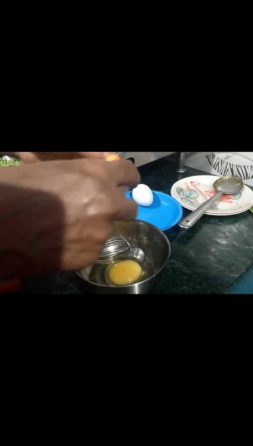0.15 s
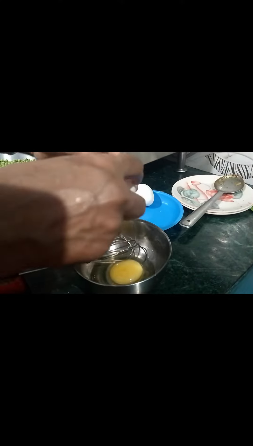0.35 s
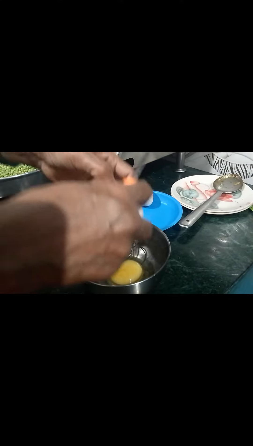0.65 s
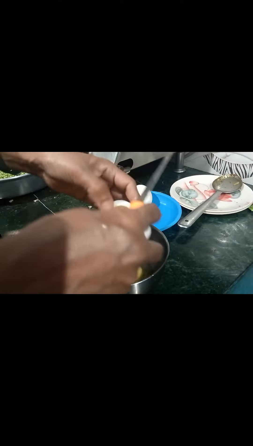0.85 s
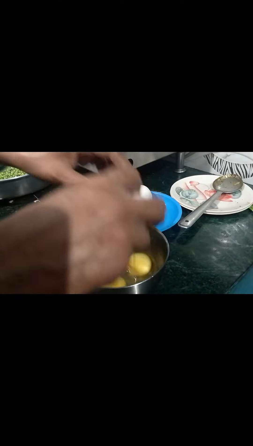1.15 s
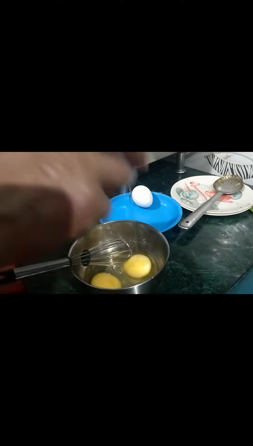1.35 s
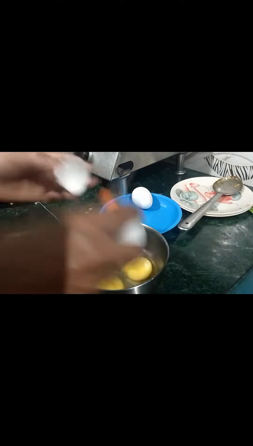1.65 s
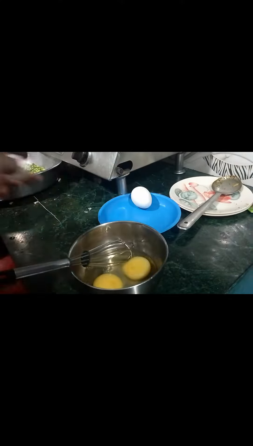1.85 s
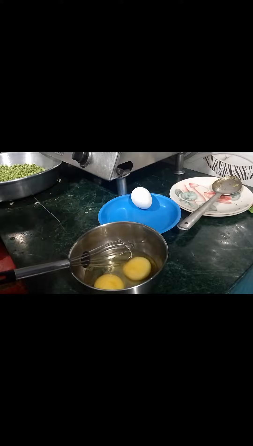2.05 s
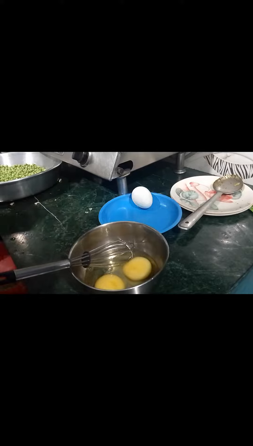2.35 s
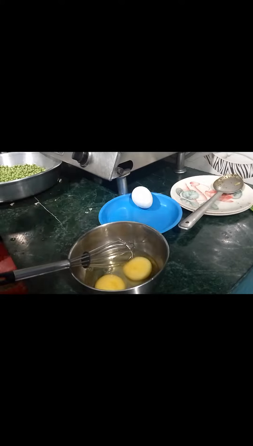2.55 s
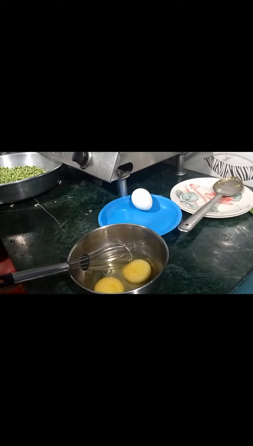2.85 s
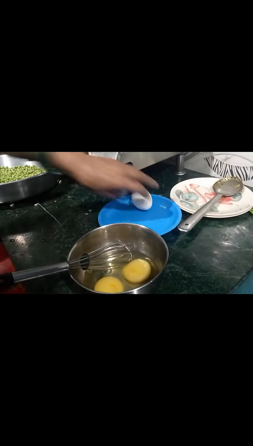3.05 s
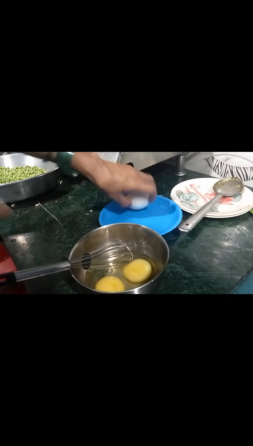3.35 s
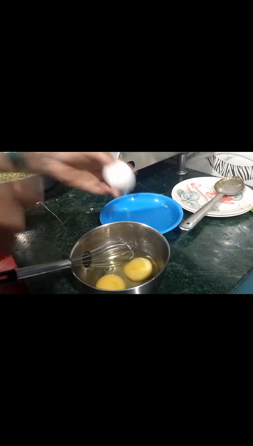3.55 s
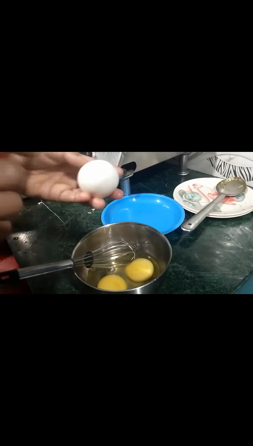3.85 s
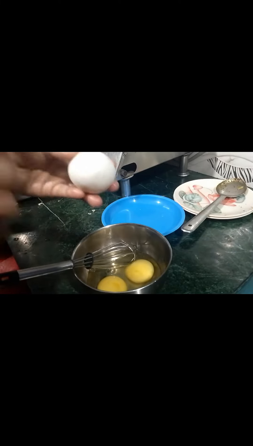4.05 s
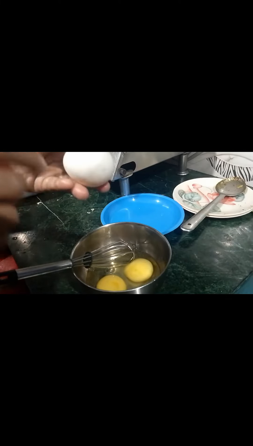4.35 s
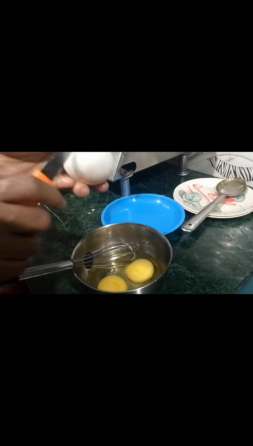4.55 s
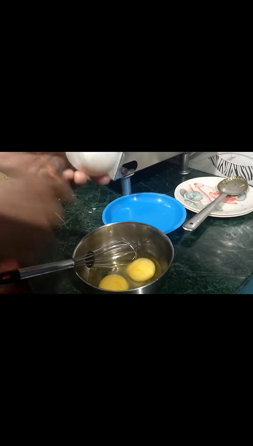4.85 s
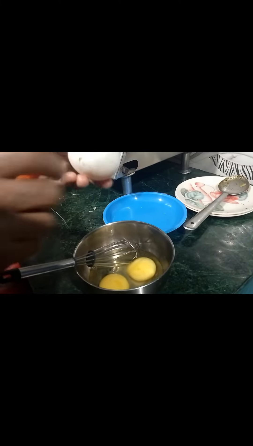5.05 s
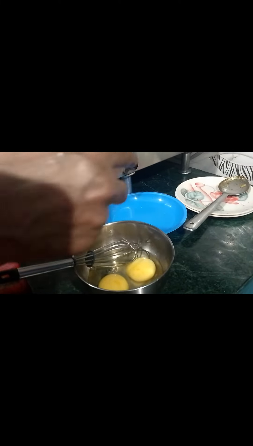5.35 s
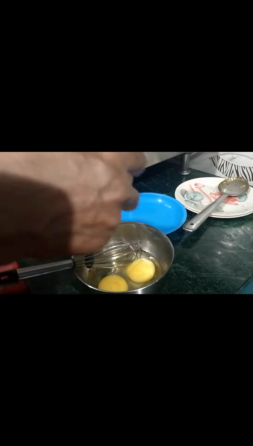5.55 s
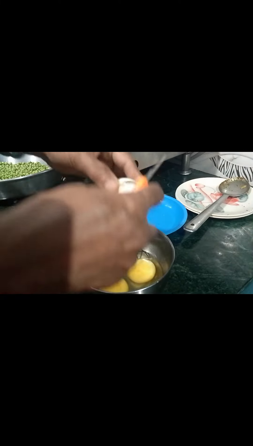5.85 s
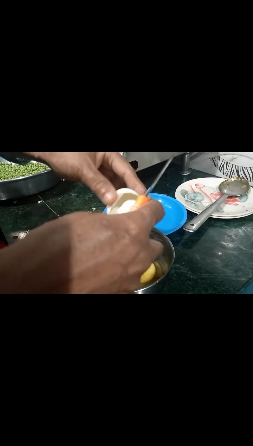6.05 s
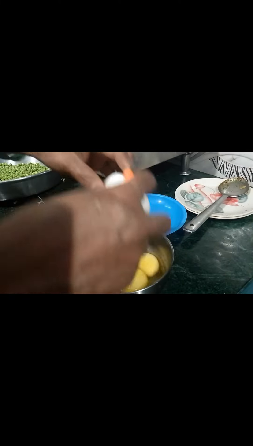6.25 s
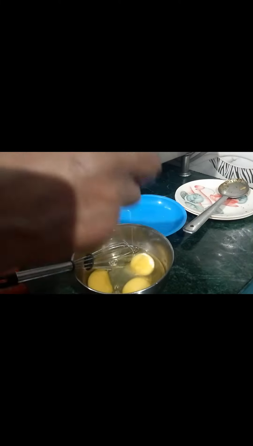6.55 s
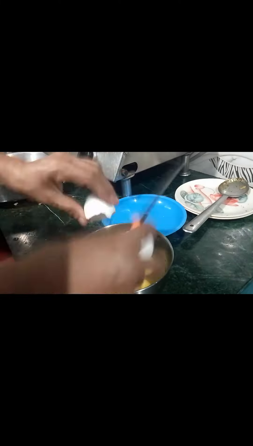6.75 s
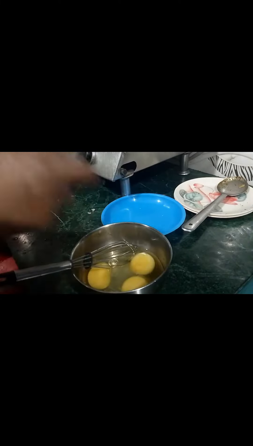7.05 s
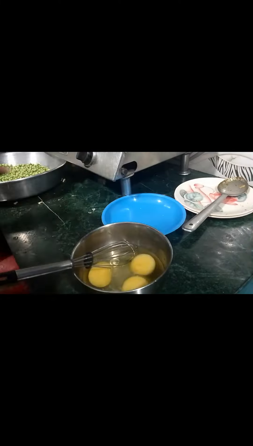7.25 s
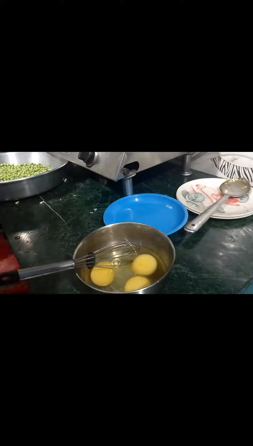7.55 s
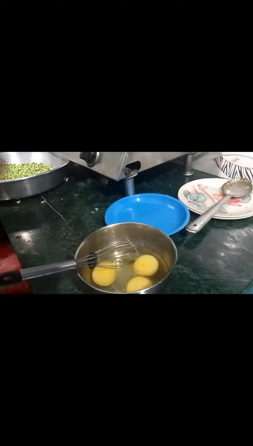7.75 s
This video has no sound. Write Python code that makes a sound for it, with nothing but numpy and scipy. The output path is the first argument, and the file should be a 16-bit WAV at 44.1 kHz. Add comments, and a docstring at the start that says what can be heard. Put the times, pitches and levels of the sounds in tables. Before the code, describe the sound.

A small, echoing kitchen heard close up, under steady hiss and a faint, steel-coloured room murmur. At 0.6-0.9 s, tiny shell breaks crackle quietly, with a faint bowl ring and little drips. Around 1.6-1.9 s, thin bangles jangle sharply, very high and quickly damped, with a low overload thump and soft shell crunches. At 2.5-3.1 s, empty shells crackle and tumble into a hollow bin that booms softly, followed by weaker bumps. From 3.6 to 4.3 s, bangles clash repeatedly. A knife cracks the shell at 3.9, hardest at 4.13, then at 4.47 and 4.86, with brief blade ring and splintery crunch. More clinks fade by 5. At 5.6-6.2 s, wet edges squeak faintly, shell tears, the bowl rings softly and a drip rises in pitch. Jangles and crisp shell crushing return at 6.65-7.3 s, then only small crumbles and hiss remain.

```python
"""In a small kitchen, eggs are opened over a steel bowl, close to the microphone.
A knife taps the shell (noise bursts and a short ring), and the shell tears in tiny irregular breaks.
Wet edges squeak and drips sound as rising tones; empty halves crackle into a hollow, booming bin.
Small metal rings (bangles, most likely) chink very high, as close-set modes struck by chains of contacts;
the hardest jangles overload the microphone with a low thump. Echoes, a murmur and a steady hiss lie around."""
import sys
import numpy as np
from scipy import signal
from scipy.fft import rfft, irfft, next_fast_len
from scipy.io import wavfile

SR = 44100
rng = np.random.default_rng(int(sys.argv[2]) if len(sys.argv) > 2 else 0)


def generate_wav(sig):
    """Save sig (samples, or channels by samples) to the path in sys.argv[1] as 16-bit PCM at SR."""
    pcm = np.round(np.clip(np.atleast_2d(sig).T, -1, 1) * 32767).astype(np.int16)
    wavfile.write(sys.argv[1], SR, pcm)


N = 348383  # length of the scene in samples

# The steel bowl and pans, which ring faintly along with other sounds.
# Each row: pitch in Hz, relative strength in dB, time to die away by 60 dB in seconds.
STEEL_MODES = [(414, 2.5, .8), (496, -1.5, 2.6), (1053, -1, 2), (1170, 7, 0.47), (1663, 7, 0.56),
               (2605, 10, 0.81)]
# The whole stack of bangles slides along the wrist and jangles.
# Each row: start of the main clash in seconds, its level in dB before the room, its length in seconds.
JANGLE_TIMES = [(0.126, -38.5, 0.016), (1.044, -52, 0.0074), (1.586, -29, .03), (1.676, -22.5, .011),
                (1.69, -15.5, 0.024), (3.809, -22.5, 0.0071), (3.824, -19.5, .009), (3.856, -29, 0.0094),
                (3.885, -33, .002), (4.011, -16.5, .009), (4.041, -24, .008), (4.247, -21, 0.0073),
                (4.29, -28.5, 0.0071), (5.356, -48, 0.02), (6.265, -52, .006), (6.756, -23, .013),
                (6.847, -18, .018), (7.096, -27, .02), (7.124, -21, 0.0033), (7.231, -39, 0.027)]

# A square hit sounds the main pitch alone; a glancing one spreads over more modes.
MAIN_HZ, JANGLE_HZ = 10910, 11500
GLANCE_SPREAD_HZ, JANGLE_SPREAD_HZ = 630, 686
CLINK_S = .0025  # how long the rings touch in a fully glancing clink


def undb(db):
    """Turn decibels into a gain."""
    return 10 ** (np.asarray(db) / 20)


def seconds(length):
    """Make a time axis in seconds."""
    return np.arange(int(length * SR)) / SR


def fade(t, t60):
    """Die away exponentially, 60 dB down after t60 seconds."""
    return np.exp(-np.log(1000) * t / t60)


def colour(x, points):
    """Shape the spectrum by (Hz, dB) points, with a minimum-phase filter that never sounds ahead of its cause."""
    size = next_fast_len(len(x) + 4096)
    hz, db = np.transpose(points)
    grid_hz = np.fft.rfftfreq(size, 1 / SR) + 1  # the 1 avoids log(0)
    log_gain = np.log(undb(np.interp(np.log(grid_hz), np.log(hz), db)))
    # folding the cepstrum forward in time makes the filter causal
    cepstrum = irfft(log_gain, size)
    cepstrum[1:] *= 2 * (np.arange(1, size) < size / 2)
    response = np.exp(rfft(cepstrum))
    return irfft(rfft(x, size) * response, size)[:len(x)]


def above(x, hz, order):
    """Steep high-pass: small bodies radiate no bass."""
    return signal.sosfilt(signal.butter(order, hz, "high", fs=SR, output="sos"), x)


def ring(modes, length):
    """Sum the dying sine tones (Hz, dB, t60) that one blow sets off."""
    t = seconds(length)
    return sum(undb(db) * fade(t, t60) * np.sin(2 * np.pi * hz * t) for hz, db, t60 in modes)


def contacts(length, rate, scatter_db):
    """Clicks of random sign and size: one at once, then irregular ones, about rate per second in all."""
    x = np.zeros(SR // 2)
    chance = np.random.default_rng(rng.integers(2 ** 31))
    count = 1 + int(max(length, 0) * rate)
    place, size, sign = chance.random((count, 3)).T
    # one click falls at random in each equal slot; the first starts on time
    slot = np.arange(count)
    at = (slot + place * (slot > 0)) / count * max(length, 0)
    x[(at * SR).astype(int)] = undb(scatter_db * size) * np.sign(sign - .5)
    return x


def through(x, response):
    """Let every moment of x set off the response, keeping the length of x."""
    return signal.fftconvolve(x, response)[:len(x)]


def snap(t60):
    """A short burst of dying noise."""
    t = np.arange(SR // 8) / SR
    return rng.standard_normal(len(t)) * fade(t, t60)


def level(x, db, length):
    """Set the rms level of a sound over its length and the 8 ms that follow."""
    head = x[:int((max(length, 0) + .008) * SR)]
    return x * undb(db) / np.sqrt(np.mean(head ** 2) + 1e-18)


def add(out, s, x):
    """Mix x in at time s, in seconds."""
    i = int(s * SR)
    out[i:i + len(x)] += x[:max(N - i, 0)]


def knife():
    """The blade breaks into the shell: one hard crack, a short crunch of splinters, a brief ring of the blade."""
    # Each row: start in seconds, crack level in dB, lowest pitch the blow reaches in Hz, blade ring in dB;
    # both levels are set ahead of the high-pass filters.
    taps = [(3.899, -30, 300, -41), (4.1282, -16, 335, -40), (4.4681, -27, 140, -68), (4.86, -24, 190, -45)]
    # Spectrum of the loudest crack. Each row: frequency in Hz, relative strength in dB.
    crack_spectrum = [(100, -28.5), (350, -14), (700, -16.5), (1100, -8), (1900, -17), (2600, -12.5),
                      (3400, -14.5), (5400, -4.5), (7200, -6), (8800, 1.5), (10300, 0.5), (11800, -7.5),
                      (15500, -14.5)]
    out = np.zeros(N)
    blade = ring([(4280, 11, 0.031), (4500, 2, 0.033), (4600, -3, 0.019), (2534, 1, 0.027)], .2)
    loudest_db = taps[1][1]
    for s, db, lowest_hz, blade_db in taps:
        crack = snap(.016) + undb(-16) * snap(.075)  # the longer, softer part is the crunch
        # harder blows are brighter
        tilt = 0.074 * (db - loudest_db)
        shape = [(hz, band_db + tilt * np.log2(hz / 8000)) for hz, band_db in crack_spectrum]
        add(out, s, above(level(colour(crack, shape), db, 0), lowest_hz, order=3))
        add(out, s, above(level(blade, blade_db, 0), 1600, order=3))
    return out


def shells():
    """The shell tears, is crushed and nested; weaker fractures crumble on after each break."""
    # Each row: start in seconds, level of the hollow sound in dB before the room, length in seconds,
    # pitch of the hollow half in Hz, splinters in dB against the hollow sound.
    breaks = [(0.576, -52, 0.023, 2250, 8), (0.748, -62, 0.013, 1870, 6), (1.351, -75, 0.0073, 2560, 18),
              (1.697, -59.5, 0.032, 2210, -17), (1.889, -51.5, 0.0044, 2554, 6.5),
              (1.929, -53, .02, 2294, 5), (5.765, -59.5, 0.045, 1380, -1.5), (5.812, -47, .026, 1820, 11),
              (5.857, -59.5, .025, 1820, 13), (5.891, -68, .15, 1096, 5), (6.111, -62, 0.013, 1540, 15),
              (6.75, -60.5, 0.031, 1930, 17.5), (6.847, -46, 0.0046, 2200, 16.5),
              (7.063, -54, .048, 1895, -16), (7.126, -40.5, .008, 1810, -8), (7.225, -56.5, 0.013, 2360, 3),
              (7.256, -44.5, 0.0087, 1744, -11.5), (7.501, -68, 0.054, 1380, -21),
              (7.661, -68, 0.043, 1645, -15)]
    crumble_lag_s, crumble_s, crumble_db = .012, .025, -20.5
    out = np.zeros(N)
    for s, db, length, hollow_hz, splinter_db in breaks:
        add(out, s, fracture(db, length, hollow_hz, splinter_db))
        crumble = fracture(db + crumble_db, crumble_s, hollow_hz, splinter_db)
        add(out, s + length + crumble_lag_s, crumble)
    return out


def fracture(db, length, hollow_hz, splinter_db):
    """Tiny fractures ring the hollow of the shell half; splinters crackle along with it."""
    # Modes of a hollow half. Each row: multiple of its pitch, relative strength in dB,
    # time to die away by 60 dB in seconds.
    cup_modes = [(.83, -4, .018), (1, 0, .024), (1.17, -5, .016), (1.45, -13, .01), (1.95, -20, .008)]
    # Spectrum of the splinters. Each row: frequency in Hz, relative strength in dB.
    splinter_spectrum = [(1000, -8.5), (2800, -41), (3600, -3), (5300, -2.5), (9000, 16), (11500, 9.5),
                         (15500, -3)]
    breaks = contacts(length, rate=450, scatter_db=9.0)
    cup = ring([(hollow_hz * ratio, gain_db, t60) for ratio, gain_db, t60 in cup_modes], .05)
    hollow = above(through(breaks, cup), 0.83 * hollow_hz, order=6)
    splinters = colour(through(breaks, snap(0.0058)), splinter_spectrum)
    return level(hollow, db, length) + level(splinters, db + splinter_db, length)


def squeaks():
    """Wet shell edges rub as they are prised open: an unsteady tone that sinks as they part."""
    # Each row: start in seconds, level in dB before the room, length in seconds, starting pitch in Hz.
    rubs = [(5.609, -77, 0.202, 748), (5.845, -64, 0.1, 902)]
    sag, wobble_depth = 0.133, .05  # shares of the starting pitch
    out = np.zeros(N)
    for s, db, length, hz in rubs:
        progress = seconds(length) / length
        wobble = np.interp(progress, np.linspace(0, 1, 40), rng.standard_normal(40))
        pitch_hz = hz * (1 - sag * progress + wobble_depth * wobble)
        phase = 2 * np.pi * np.cumsum(pitch_hz) / SR
        swell = np.sin(np.pi * np.sqrt(progress))  # grows quickly, fades slowly
        add(out, s, level(swell * np.sin(phase), db, length))
    return out


def drips():
    """Egg drips into the bowl; each drip traps a bubble whose pitch rises a little."""
    # Each row: start in seconds, level in dB before the room, starting pitch in Hz,
    # time to die away by 60 dB in seconds.
    drops = [(0.857, -60, 5130, 0.028), (0.859, -56, 7120, .028), (.9, -54.5, 1954, 0.077),
             (2.083, -62.5, 4640, 0.027), (6.172, -54, 1450, 0.052)]
    out, t = np.zeros(N), seconds(.2)
    for s, db, hz, t60 in drops:
        bubble = fade(t, t60) * np.sin(2 * np.pi * hz * t * (1 + 0.25 * t))
        add(out, s, level(bubble, db, 0))
    return out


def bowl():
    """The steel bowl rings softly when the egg slides in or a hand brushes it."""
    # Each row: start in seconds, level in dB before the room.
    touches = [(0.588, -69), (3.174, -70), (5.838, -60.5)]
    # What the filled bowl rings with. Each row: pitch in Hz, relative strength in dB,
    # time to die away by 60 dB in seconds.
    bowl_modes = [(1064, -14, 0.35), (1136, -10, 0.84), (2034, -8.5, 1), (2615, 1, 0.54),
                  (4270, -0.5, 0.32), (5360, -8.5, 0.28)]
    out = np.zeros(N)
    for s, db in touches:
        add(out, s, level(above(ring(bowl_modes, .6), 1100, order=3), db, 0))
    return out


def toss():
    """Empty shells crackle as they land and tumble, and the bin booms under them, a little differently each time."""
    # Each row: start in seconds, crackle level in dB, length in seconds, centre of the crackle in Hz,
    # boom in dB (each mode's own strength is added); levels are ahead of the last high-pass and the room.
    landings = [(2.525, -31.5, 0.051, 2150, -39), (2.659, -55, .13, 1090, -52),
                (2.802, -35, .025, 4500, -47), (2.845, -40, .022, 3080, -45.5),
                (2.899, -57.5, 0.09, 1300, -51), (3.102, -66, 0.082, 2610, -64.5)]
    # Spectrum of the landing shells. Each row: frequency in Hz, relative strength in dB.
    crackle_spectrum = [(200, -29), (600, 2.5), (1300, 7.5), (2600, 1.5), (3400, 2), (4500, -3), (7000, 2),
                        (9500, 11), (11200, 0), (15000, -7)]
    # The hollow bin. Each row: average pitch in Hz, average strength in dB against the boom,
    # time to die away by 60 dB in seconds.
    bin_modes = [(142.6, -21, 0.41), (176, -15, 0.49), (210.5, -14.5, 0.18), (259.6, -12, 0.23),
                 (320, -19, 0.104), (321, -32.5, 0.17), (441, -16, 0.13), (508, -23, 0.16),
                 (706, -18, 0.14), (892, -18, 0.037)]
    boom_lag_s = .018  # the bin answers after the first crackle
    out = np.zeros(N)
    for s, db, length, centre_hz, boom_db in landings:
        hits = through(contacts(length, rate=800, scatter_db=8), snap(.02))
        # the crackle weakens by 3 dB per octave away from its centre
        shape = [(hz, band_db - 3 * abs(np.log2(hz / centre_hz))) for hz, band_db in crackle_spectrum]
        # small fragments radiate little below their own pitch
        crackle = above(colour(hits, shape), .5 * centre_hz, order=3)
        add(out, s, level(crackle, db, length))
        for hz, mode_db, t60 in bin_modes:
            detune, vary_db = rng.standard_normal(2)
            mode = through(hits, ring([(hz * (1 + 0.048 * detune), 0, t60)], .4))
            add(out, s + boom_lag_s, level(mode, boom_db + mode_db + vary_db, length + .03))
    return above(out, 130, order=8)


def bumps():
    """Soft pushes on the bin and the worktop, each answered by one damped, hollow resonance."""
    # Each row: start in seconds, level in dB before the room, length in seconds, pitch in Hz.
    pushes = [(2.566, -40, 0.021, 262), (2.671, -54.5, .04, 356), (2.725, -52, 0.03, 867),
              (2.774, -56, 0.017, 154), (2.958, -56, 0.033, 891), (3.11, -57.5, 0.067, 290),
              (4.863, -64.5, .07, 257), (6.897, -63, 0.072, 292)]
    out = np.zeros(N)
    for s, db, length, hz in pushes:
        push = through(contacts(length, rate=300, scatter_db=3), snap(.012))
        hollow = through(push, ring([(hz, 0, .1)], .2))
        add(out, s, level(above(hollow, 0.52 * hz, order=3), db, length))
    return out


def bangles():
    """Metal rings clink and jangle, with faint chance chinks of the moving wrist mixed in."""
    stray_per_s, stray_db = 1.5, -52.5  # the level is that of the loudest; others are up to 6 dB softer
    out = clinks() + jangles()
    for place, soft in rng.random((int(stray_per_s * N / SR), 2)):
        stray = chink(stray_db - 6 * soft, CLINK_S, JANGLE_HZ, GLANCE_SPREAD_HZ)
        add(out, place * N / SR, stray)
    return out


def clinks():
    """Two bangles clash once: square hits ring pure, glancing ones are rougher and rebound once."""
    # Each row: start in seconds, level in dB before the room, favoured pitch in Hz.
    clashes = [(1.459, -48.5, 11700), (1.826, -30, 10790), (1.858, -36, 10500), (1.884, -23.5, 10450),
               (2.203, -50, 11500), (2.271, -35.5, 11040), (2.672, -38, 11100), (2.955, -42.5, 11000),
               (3.641, -31.5, 12300), (3.72, -29.5, 10780), (3.967, -27.5, 10980), (4.004, -13.5, 11050),
               (4.179, -37, 11900), (4.241, -15.5, 10910), (4.531, -38, 11650), (4.571, -22.5, 12900),
               (4.596, -28, 12200), (4.821, -38.5, 11330), (4.971, -26, 10930), (5.013, -32, 12400),
               (6.651, -41, 11700), (6.834, -22.5, 11170), (6.951, -36.5, 11450), (7.029, -26.5, 11020),
               (7.078, -23, 11350), (7.494, -50, 11070)]
    glance_hz, square_spread_hz = 650, 82  # this far off the main pitch, a hit is fully glancing
    rebound_s, rebound_db = 0.012, -8.5  # average delay; level ahead of the glance factor
    out = np.zeros(N)
    for s, db, pitch_hz in clashes:
        glance = min(abs(pitch_hz - MAIN_HZ) / glance_hz, 1)
        spread_hz = square_spread_hz + glance * (GLANCE_SPREAD_HZ - square_spread_hz)
        add(out, s, chink(db, glance * CLINK_S, pitch_hz, spread_hz))
        rebound_at = s + rebound_s * rng.uniform(.8, 1.2)
        add(out, rebound_at, glance * chink(db + rebound_db, 2 * CLINK_S, MAIN_HZ, spread_hz))
    return out


def jangles():
    """The sliding stack gathers in soft chatter, clashes, and settles in soft chatter."""
    # durations as shares of the main clash, levels in dB against it
    gather_share, gather_db, settle_share, settle_db = 0.9, -14, 1.5, -13.5
    out = np.zeros(N)
    for s, db, length in JANGLE_TIMES:
        gather, settle = gather_share * length, settle_share * length
        add(out, s - gather, chink(db + gather_db, gather, JANGLE_HZ, JANGLE_SPREAD_HZ))
        add(out, s, chink(db, length, JANGLE_HZ, JANGLE_SPREAD_HZ))
        add(out, s + length, chink(db + settle_db, settle, MAIN_HZ, JANGLE_SPREAD_HZ))
    return out


def chink(chink_db, length, pitch_hz, spread_hz):
    """Rings chatter against each other; the place of contact favours some of their close modes."""
    # What the bangles ring with. Each row: average pitch in Hz, relative strength in dB.
    bangle_modes = [(5480, -25), (5890, -12.5), (6230, -3), (6700, -7), (8950, 7.5), (9450, 8.5),
                    (10080, -6.5), (10430, 14.5), (10620, -22.5), (11090, 10), (11220, 5.5), (11360, 3),
                    (11600, 16), (11780, -9.5), (11920, 6.5), (12180, -1.5), (12400, 13.5), (12790, 4),
                    (12950, 3), (14750, -2)]
    # How well the small rings radiate. Each row: frequency in Hz, gain in dB.
    radiation = [(1000, -60), (4300, -34), (5300, -19), (6100, -9), (7600, -15), (9000, -8), (10400, 0),
                 (12900, 0), (13600, -11), (15500, -11)]
    base_t60_s = .05  # for a mode at 11000 Hz after the briefest contact
    ring_detune = .006  # share by which one ring typically differs from the next
    hz, db = np.transpose(bangle_modes)
    # favour modes near the pitch, down to a floor that drops for narrow spreads
    near_db = np.maximum(-1.8 * ((hz - pitch_hz) / spread_hz) ** 2, -4 - 3000 / spread_hz)
    favour_db = np.where(abs(hz - pitch_hz) < 2000, near_db, -16 + spread_hz / 55)
    # low modes last longer; rings that stay in contact damp each other
    t60 = base_t60_s * (11000 / hz) ** 1.3 / (1 + max(length, 0) / .05)
    detune, vary = rng.standard_normal((2, len(hz)))
    modes = np.transpose([hz * (1 + ring_detune * detune), db + favour_db + 1.5 * vary, t60])
    hits = contacts(length, rate=470, scatter_db=9.5)[:SR // 5]
    # neighbouring modes swing in opposite directions
    response = ring(modes[::2], .15) - ring(modes[1::2], .15)
    tone = level(through(hits, response), 0, length)
    # flat clashes, which spread over many modes, also tick more
    tick = level(through(hits, snap(0.047)), -22 + spread_hz / 36, length)
    return level(colour(tone + tick, radiation), chink_db, length)


def overload_thumps():
    """The hardest jangles overload the microphone, which adds a dull, dry low thump, far weaker for softer ones."""
    # Spectrum of the thump. Each row: frequency in Hz, relative strength in dB.
    thump_spectrum = [(25, 13.5), (70, -1), (200, 2.5), (400, -5), (1200, -5.5), (2400, -10), (5000, -14.5),
                      (12000, -24)]
    full_db, full_from_db, slope = -47.5, -19.5, 4  # below full_from_db, lose 4 dB per dB of energy
    lag_s, share = .003, .45  # delay, and length as a share of the jangle
    out = np.zeros(N)
    for s, db, length in JANGLE_TIMES:
        bursts = through(contacts(share * length, rate=800, scatter_db=3), snap(.004))
        # energy is expressed as the level of a jangle lasting 10 ms
        energy_db = db + 10 * np.log10(max(length, .001) / .01)
        thump_db = full_db - slope * max(full_from_db - energy_db, 0)
        add(out, s + lag_s, level(colour(bursts, thump_spectrum), thump_db, share * length))
    return out


def handling():
    """Faint stray ticks of fingers, shell and rings, about 25 per second at random."""
    # Spectrum of a light tick. Each row: frequency in Hz, relative strength in dB.
    tick_spectrum = [(2000, -36.5), (4500, -25.5), (6200, -1.5), (7500, -30), (9000, 3), (11800, -12),
                     (13500, -12.5), (15500, -24)]
    ticks = (rng.random(N) < 25 / SR) * undb(10 * rng.random(N))
    return level(colour(through(ticks, snap(.03)), tick_spectrum), -70, N / SR)


def kitchen(x, wet_db, t60, steel_db):
    """Worktop and tiled walls: dense early echoes, a duller long tail, and steel vessels that ring along."""
    t = seconds(.8)
    early, late = rng.standard_normal((2, len(t))) * (t > .004)  # echoes start after 4 ms
    late = colour(late * fade(t, .9), [(1500, 0), (7000, -2), (11500, -9)])
    tail = early * fade(t, t60) + undb(-13.5) * late
    tail = tail / np.sqrt(np.sum(tail ** 2))  # unit energy ahead of the colouring
    tail = colour(tail, [(200, 4.5), (2000, 0.5), (6000, 0.5), (10000, 4.0), (15000, -9.5)])
    steel = undb(steel_db) * ring(STEEL_MODES, .8)
    return x + undb(wet_db) * through(x, tail + steel)


def background():
    """Steady hiss over a faint room murmur that the steel vessels colour."""
    # Spectrum of the hiss. Each row: frequency in Hz, relative strength in dB per Hz.
    hiss_spectrum = [(25, 8.5), (48, -2), (75, -20.5), (105, -20), (145, 1.5), (300, -6), (430, 0.5),
                     (600, -7.5), (1100, -6), (1450, -10.5), (1750, -7), (3600, -9.5), (6300, -8),
                     (9200, 3), (11500, -4.5), (15500, -16.5)]
    hiss = level(colour(rng.standard_normal(N), hiss_spectrum), -62.5, N / SR)
    # the steel pitches, heavily damped
    damped_steel = ring([(hz, db, .03) for hz, db, _ in STEEL_MODES], .1)
    murmur = above(through(rng.standard_normal(N), damped_steel), 327, order=4)
    return hiss + level(murmur, -76.5, N / SR)


def scene():
    """Rings close by, eggs just behind them, the bin further off; overload thumps and background get no room."""
    near = kitchen(bangles() + handling(), wet_db=-15, t60=.22, steel_db=-65)
    egg_sounds = knife() + shells() + squeaks() + drips() + bowl()
    eggs = kitchen(egg_sounds, wet_db=-5.5, t60=0.2, steel_db=-62.5)
    far = kitchen(toss() + bumps(), wet_db=-7, t60=0.39, steel_db=-65.5)
    return (near + eggs + far + overload_thumps() + background())[None]  # one channel


def record(dry):
    """Round the highest peaks softly, then cut the top steeply above 15600 Hz."""
    low_pass = signal.ellip(10, .2, 85, 15600, fs=SR, output="sos")
    return signal.sosfilt(low_pass, np.tanh(dry))


dry = scene()
out = record(dry)
generate_wav(out)
```